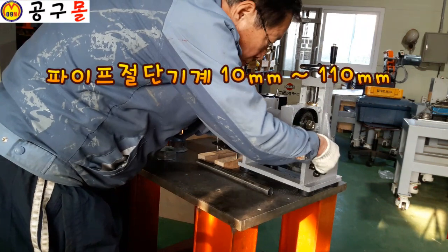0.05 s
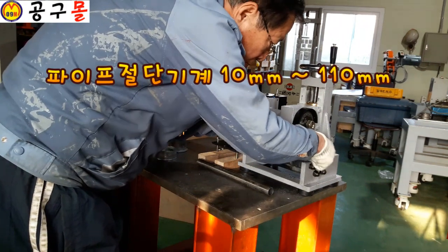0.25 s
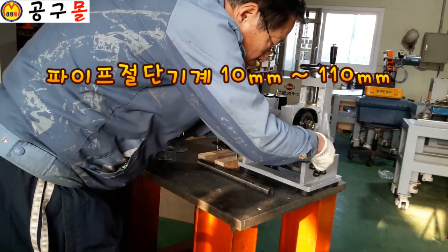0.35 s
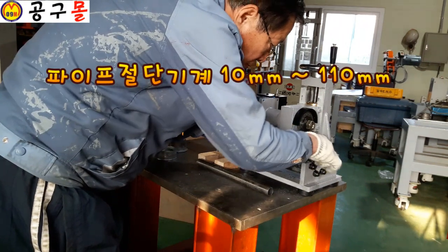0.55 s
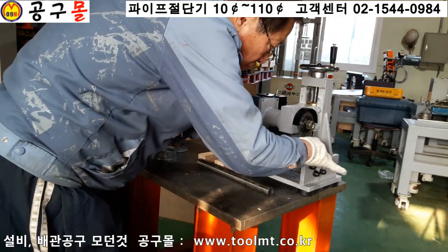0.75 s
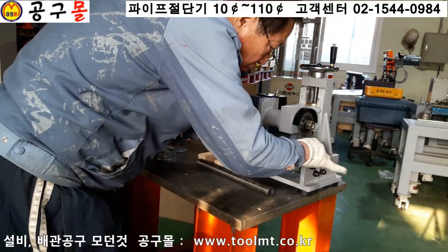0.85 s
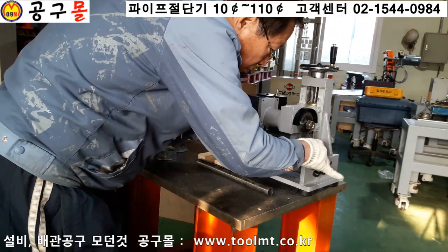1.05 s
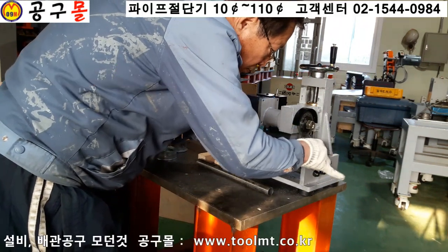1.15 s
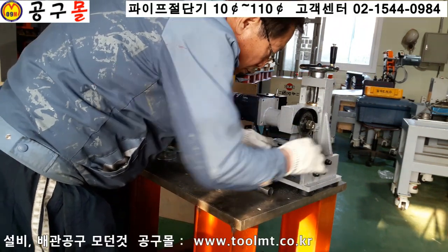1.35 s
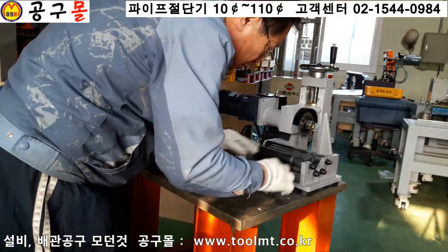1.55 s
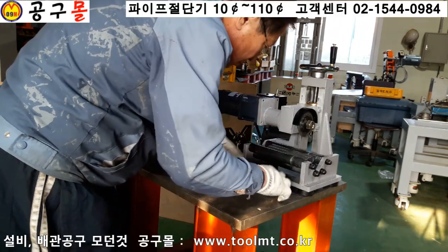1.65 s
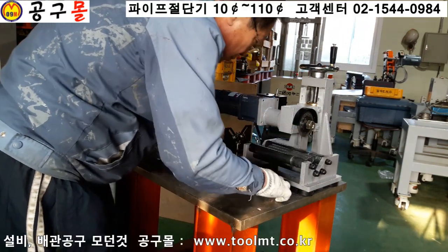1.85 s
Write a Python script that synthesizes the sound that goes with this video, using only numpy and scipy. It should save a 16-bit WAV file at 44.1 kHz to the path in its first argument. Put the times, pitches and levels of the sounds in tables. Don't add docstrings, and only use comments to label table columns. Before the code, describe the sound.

One loud metallic clank of a short pipe on a heavy machine, then faint taps and low drone

```python
import sys
import numpy as np
from scipy import signal
from scipy.fft import rfft, irfft, next_fast_len
from scipy.io import wavfile
from scipy.ndimage import uniform_filter1d

SR = 44100
rng = np.random.default_rng(int(sys.argv[2]) if len(sys.argv) > 2 else 0)


def invert_db(level):
    return 10 ** (np.asarray(level, dtype=float) / 20)


def persist_wave(psi):
    counts = np.round(np.clip(psi, -1, 1) * 32767).astype(np.int16)
    wavfile.write(sys.argv[1], SR, np.atleast_2d(counts).T)


N = 83790
T = np.arange(SR) / SR


def unit(x):
    return x / np.sqrt(np.mean(x ** 2) + 1e-20)


def along(points, hz):
    f, v = np.transpose(points)
    return np.interp(np.log(hz + 1), np.log(f + 1), v)


def filtered(x, response):
    n = x.shape[-1]
    m = next_fast_len(n + 8192)
    return irfft(rfft(x, m) * response(np.fft.rfftfreq(m, 1 / SR)), m)[..., :n]


def peak(f, hz, width_hz):
    return 1j * f * width_hz / (hz * hz - f * f + 1j * f * width_hz)


def delayed(x, seconds):
    return np.pad(x, (round(seconds * SR), 0))


# frequency in Hz, left-right likeness from 0 to 1.
LIKENESS = [(60, 1), (240, 0.87), (950, 0.067), (3770, 0.01), (15000, 0.0093)]
# frequency in Hz, left minus right in dB.
LEAN = [(60, -2.5), (380, -1), (2380, 0), (15000, 4)]


def rush(gain, patchy_db):
    z = signal.stft(rng.standard_normal((2, N)), nperseg=1024)[2]
    field = rng.standard_normal(z.shape[1:])
    field = uniform_filter1d(field, size=4, axis=0)
    field = uniform_filter1d(field, size=6, axis=1)
    pair = signal.istft(z * invert_db(patchy_db * unit(field)), nperseg=1024)[1][:, :N]

    def mid_side_gain(f):
        angle = np.arccos(np.clip(along(LIKENESS, f), -1, 1)) / 2
        return gain(f) * np.array([np.cos(angle), np.sin(angle)])

    def lean(f):
        return invert_db(along(LEAN, f) / 2 * np.array([[1], [-1]]))

    mid, side = filtered(pair, mid_side_gain)
    return unit(filtered(np.array([mid + side, mid - side]), lean))


# frequency in Hz, density in dB per Hz.
AIR_SPECTRUM = [(15, -57.5), (25, -27.5), (99, -1.5), (215, -11.5), (274, -6.5), (666, -26), (919, -24.5),
                (1080, -29.5), (15500, -56.5)]


def workshop_air():
    return invert_db(-49) * rush(lambda f: invert_db(along(AIR_SPECTRUM, f)), patchy_db=-3.37)


# frequency in Hz, width in Hz, level in dB.
DRONE_BANDS = [(94, 39, -1.5), (160, 30, -2.5), (280, 8.7, 2), (358, 8.3, -8.5)]


def machinery_drone():
    def bands(f):
        return sum(invert_db(db) * abs(peak(f, hz, width_hz)) ** 2 for hz, width_hz, db in DRONE_BANDS)

    return invert_db(-51.5) * rush(bands, patchy_db=4.5)


def microphone_hiss():
    noise = rng.standard_normal((2, N))
    return invert_db(-75.5) * unit(filtered(noise, lambda f: peak(f, 14000, 8000)))


def casting_knock(chatter, upper_db, lower_hz, soft_db):
    chatter_db, t60_s, top_hz = -14.5, 0.014, 5650
    edge_db = -6.5 + 0.25 * soft_db
    blow = invert_db(chatter_db - 60 * T / t60_s) * chatter
    blow[0] += 1

    def casting(f):
        dull = 1 / (1 + 1.4j * f / top_hz - (f / top_hz) ** 2) ** 2
        lower = peak(f, lower_hz, 650) ** 2
        upper = peak(f, 2850, 1150) ** 2 + invert_db(edge_db) * peak(f, 4800, 3000)
        return dull * (lower + invert_db(upper_db) * upper)

    knock = filtered(blow, casting)
    return knock / abs(knock).max()


def ringing(freqs, modes, rise_s, scatter_db):
    db, t60 = np.transpose(modes)[..., None]
    sign = (-1) ** np.arange(len(modes))[:, None]
    level = db + scatter_db * rng.standard_normal(db.shape)
    sines = np.sin(2 * np.pi * np.outer(freqs, T))
    return (sign * invert_db(level - 60 * T / t60) * sines).sum(0) * (1 - np.exp(-T / rise_s))


STRUCTURE_RISE_S = 0.00023
FRAME_MODE_HZ = [253, 400, 685, 950, 1090, 1185, 1380, 1703, 1950, 2266, 2650, 2880, 3080, 4161]
# level in dB, decay time t60 in seconds.
FRAME_MODES = [(-15, 0.78), (-17.5, 0.2), (-8, 0.054), (-11.5, 0.025), (-15, 0.073), (-8, 0.09),
               (-16.5, 0.049), (-7, 0.03), (-2.5, 0.028), (-19.5, 0.45), (-15.5, 0.013), (2.5, 0.028),
               (-7.5, 0.013), (-4.5, 0.014)]


def frame_ring(upper_db, soft_db):
    def tilt(f):
        return (1 + invert_db(upper_db) * (f / 1600) ** 2) / (1 + (f / 1600) ** 2)

    ring = ringing(FRAME_MODE_HZ, FRAME_MODES, STRUCTURE_RISE_S, scatter_db=1)
    return invert_db(-10.5 + 0.2 * soft_db) * filtered(ring, tilt)


PIPE_MODE_HZ = [5240, 5320, 6659, 8597, 11440, 11660, 12180, 12550, 13630, 15110, 15520]
# level in dB, decay time t60 in seconds.
PIPE_MODES = [(-29.5, .04), (-1.5, 0.13), (-37.5, .1), (-40.5, 0.037), (-23, 0.044), (-10.5, 0.091),
              (-15, .15), (-30, .05), (-10.5, 0.12), (-34.5, .12), (-25, 0.098)]


def pipe_ring(fizz, ring_db, soft_db):
    rise_s, sizzle_db, sizzle_t60_s = 0.00037, -19, 0.14
    fizz = fizz * invert_db(sizzle_db - 60 * T / sizzle_t60_s)
    sizzle = filtered(fizz, lambda f: peak(f, 11770, 1300) ** 3)
    pipe = invert_db(ring_db) * (ringing(PIPE_MODE_HZ, PIPE_MODES, rise_s, scatter_db=1.5) + sizzle)
    return filtered(pipe, lambda f: invert_db(0.25 * soft_db * (f > 13000)))


def microphones(x):
    return np.array([delayed(x, 0.000045)[:len(x)], x])


ECHO_S = [.0045, .009, .014, .0205, .025]
# left level in dB, right level in dB.
ECHO_LEVELS = [(-15, -17.5), (-16, -10.5), (-15, -17), (-14, -10.5), (-16.5, -16)]


def walls(x):
    pan_db = 0.73
    out = microphones(x) * invert_db([[pan_db], [-pan_db]])
    for delay_s, (left_db, right_db) in zip(ECHO_S, ECHO_LEVELS):
        out = out + delayed(x, delay_s)[:len(x)] * invert_db([[left_db], [right_db]])
    return out


BODY_TAIL_DB, PIPE_TAIL_DB = -2.5, 1
# frequency in Hz, decay time t60 in seconds.
SHOP_DECAY = [(200, 0.65), (600, 0.92), (1400, 0.83), (3500, 0.75), (5400, 0.72), (7000, .55), (12000, .35)]


def shop(x):
    hz, t, z = signal.stft(rng.standard_normal((2, SR)), SR, nperseg=256)
    decay = invert_db(-60 * t / along(SHOP_DECAY, hz)[:, None])
    left, right = signal.istft(z * decay, SR, nperseg=256)[1]
    alike = filtered(left - right, lambda f: 1 / (1 + (f / 451.4) ** 2))
    tail = np.array([left, right + alike])
    tail = tail / np.linalg.norm(left)
    return signal.fftconvolve(delayed(x, 0.006)[None], tail, axes=1)[:, :SR]


# start in seconds, peak level in dB, upper over lower knock band in dB,
# lower band in Hz, pipe ring in dB.
CONTACTS = [
    (0.0141, -28, -6, 1300, -36),
    (.038, -35, 8.5, 1275, -31),
    (.153, -30, -13, 1467, -26.5),
    (0.167, -35.5, -3, 1250, -21.5),
    (0.231, -8, 4, 992, -4),
    (0.25, -17, -1, 1020, -33.5),
    (.873, -41.5, -12.5, 1466, -26),
    (0.884, -32.5, -9.5, 950, -27),
    (1.040, -40, -4.5, 2270, -25),
    (1.56, -52, -9, 1285, -42),
]


def contacts():
    out = np.zeros((2, N + SR))
    hardest_db = max(row[1] for row in CONTACTS)
    for start_s, db, upper_db, lower_hz, ring_db in CONTACTS:
        soft_db = db - hardest_db
        chatter, fizz = rng.standard_normal((2, SR)) * (1 - np.exp(-T / 0.0009))
        body = casting_knock(chatter, upper_db, lower_hz, soft_db) + frame_ring(upper_db, soft_db)
        pipe = pipe_ring(fizz, ring_db, soft_db)
        tail = shop(invert_db(BODY_TAIL_DB) * body + invert_db(PIPE_TAIL_DB) * pipe)
        heard = walls(body) + microphones(pipe) + tail
        start = round(start_s * SR)
        out[:, start:start + SR] += invert_db(db) * heard
    return out[:, :N]


JAW_HZ = [1200, 1384, 2100]
# level in dB, decay time t60 in seconds.
JAW_MODES = [(1.5, .07), (-5.5, 0.1068), (7.5, 0.01005)]


def loose_jaw():
    out = np.zeros((2, N + SR))
    jaw = invert_db(-35.5) * ringing(JAW_HZ, JAW_MODES, STRUCTURE_RISE_S, scatter_db=0)
    start = round(0.153 * SR)
    out[:, start:start + SR] = walls(jaw) + shop(invert_db(BODY_TAIL_DB) * jaw)
    return out[:, :N]


def scene():
    struck = contacts() + loose_jaw()
    return struck + workshop_air() + machinery_drone() + microphone_hiss()


def band_limit(x):
    return signal.sosfilt(signal.butter(12, 17160, fs=SR, output="sos"), x)


def record(dry):
    mix = filtered(dry, lambda f: f < 15800)
    return band_limit(mix)


dry = scene()
out = record(dry)
persist_wave(out)
```